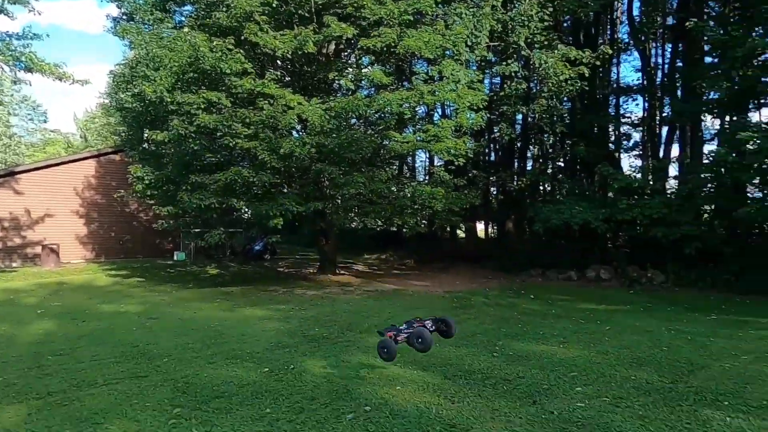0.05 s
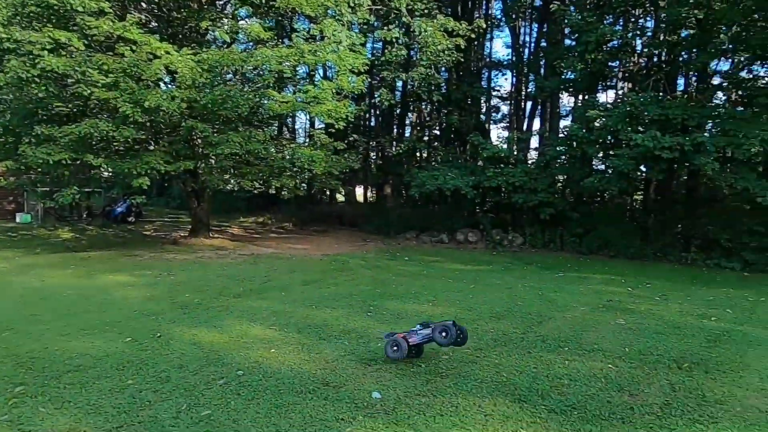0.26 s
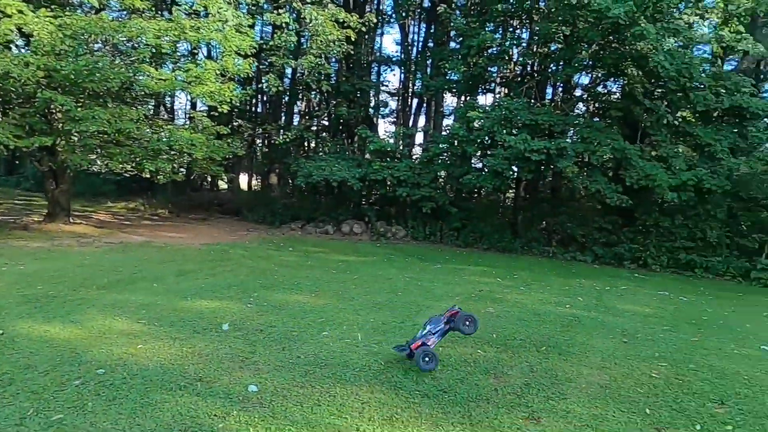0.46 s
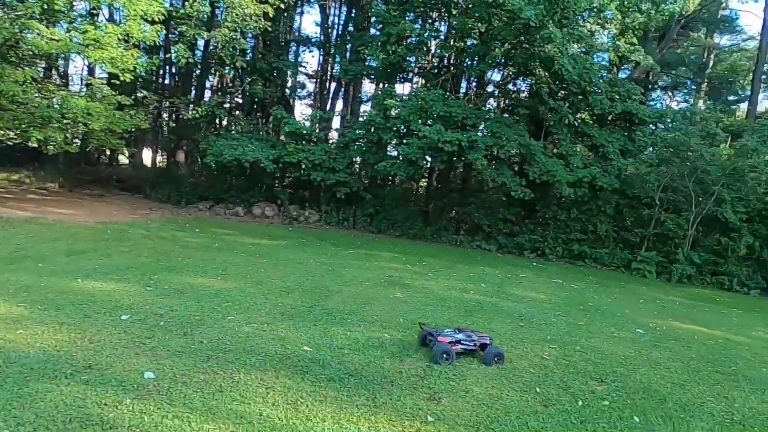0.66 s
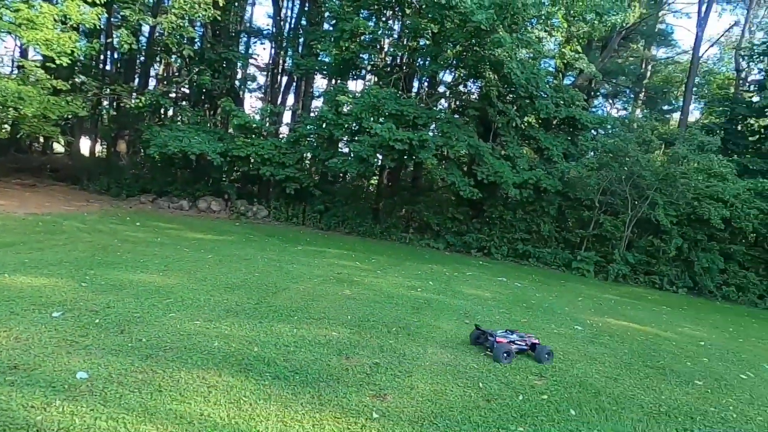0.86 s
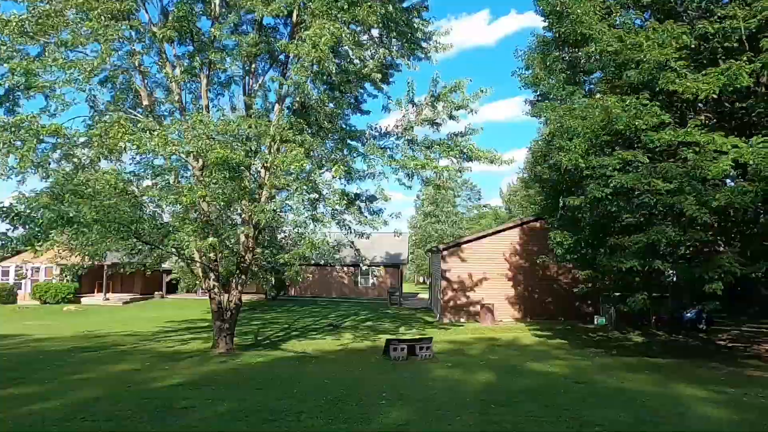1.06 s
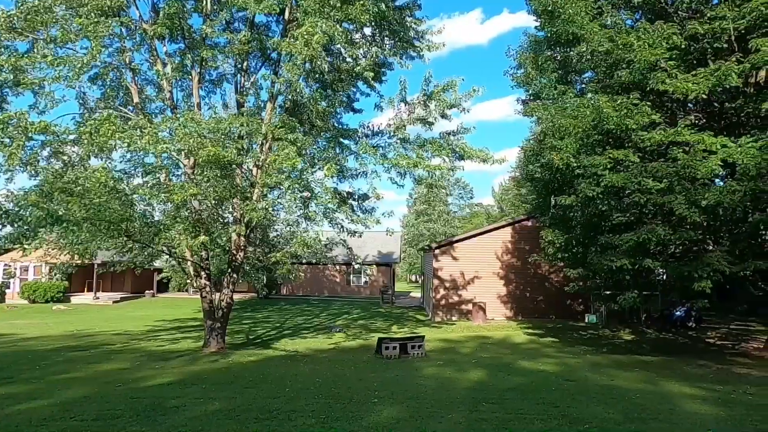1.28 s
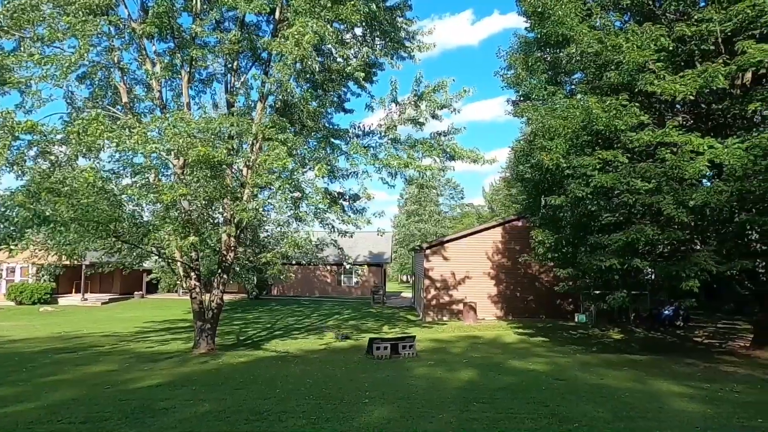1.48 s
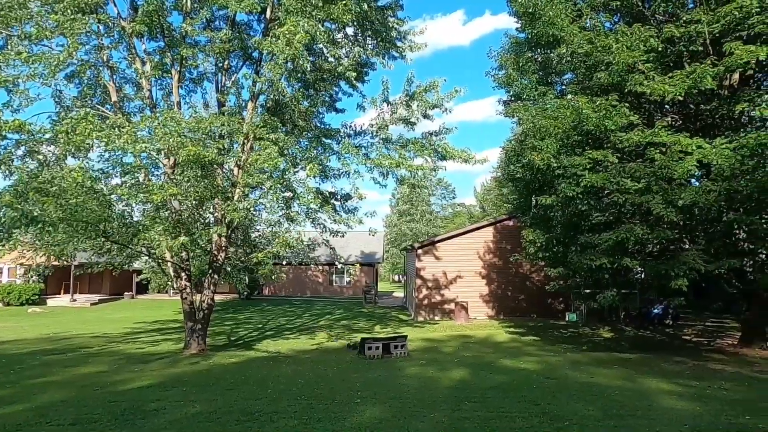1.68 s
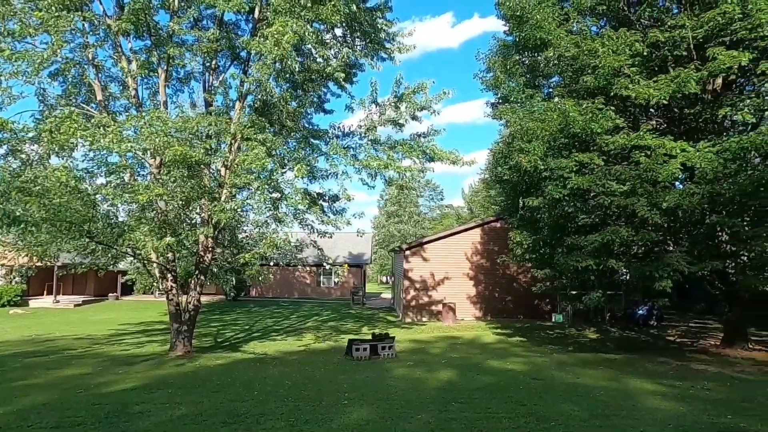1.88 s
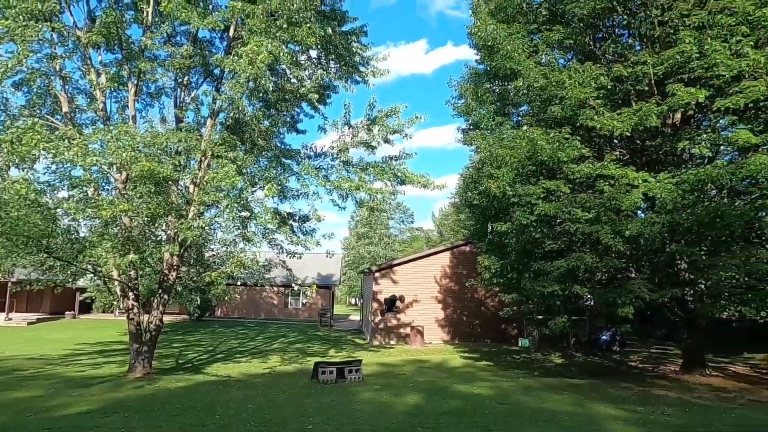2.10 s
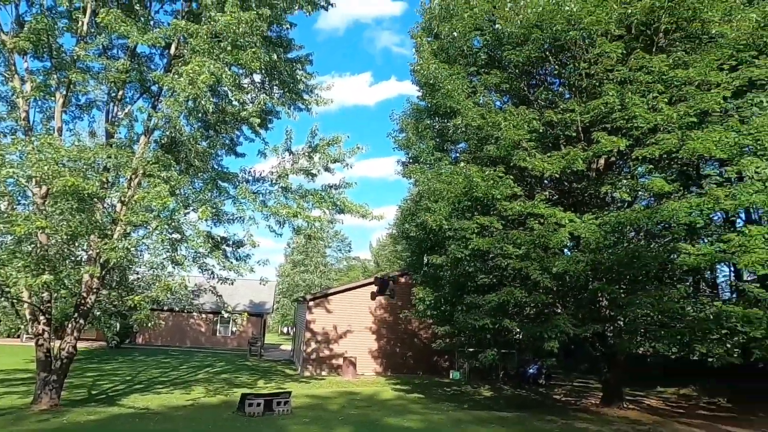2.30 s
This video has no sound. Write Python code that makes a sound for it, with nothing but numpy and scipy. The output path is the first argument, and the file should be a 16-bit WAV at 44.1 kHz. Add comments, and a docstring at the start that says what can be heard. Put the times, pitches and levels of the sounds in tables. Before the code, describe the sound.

Whining radio-controlled car lands hard, races across a lawn and clatters off a ramp.

```python
"""A radio-controlled car drops onto a lawn with its wheels spinning, bounces and blips its throttle.
After an abrupt change of scene it races over the grass, bangs up a small ramp and whirs off through the air.
Its gears whine at a pitch that follows the motor, its tyres tear at the grass, and each blow makes
the body ring and loose plastic clatter. A far engine, probably a mower, drones behind,
and light wind rumbles on the microphone."""
import sys
import numpy as np
from scipy import signal
from scipy.fft import rfft, irfft, next_fast_len
from scipy.io import wavfile
from scipy.ndimage import map_coordinates

SR = 44100
rng = np.random.default_rng(int(sys.argv[2]) if len(sys.argv) > 2 else 0)


def master_out(mix):
    """Clip the mix to full scale and print it as 16-bit PCM to the path in sys.argv[1]."""
    frames = np.transpose(np.atleast_2d(mix))
    ceiling = np.clip(frames, -1, 1)
    pcm = np.round(ceiling * 32767).astype(np.int16)
    wavfile.write(sys.argv[1], SR, pcm)


N = 108045
TIME = np.arange(N) / SR
SCENE_CHANGE_S, TAKEOFF_S = 1.036, 2

# Gear whine on the run-up and in flight. Each row: time in seconds, pitch in Hz, level in dB.
RUN_WHINE = [(1.04, 1920, -51), (1.12, 2056, -50), (1.18, 1998, -49), (1.27, 2055, -47), (1.32, 1995, -49),
             (1.4, 2073, -50), (1.7, 2077, -43), (1.78, 2050, -49), (1.83, 2250, -39), (1.89, 2650, -32.5),
             (1.97, 2380, -39), (2.12, 2262, -48), (2.28, 1918, -44), (2.45, 1816, -49)]


def from_db(db):
    """Turn decibels into a gain."""
    return 10 ** (np.asarray(db) / 20)


def rms_one(x):
    """Scale a signal to an average strength (rms) of 1."""
    return x / np.sqrt(np.mean(x ** 2) + 1e-20)


def in_time(rows):
    """Join timed rows with straight lines, giving one curve for each column after the time."""
    times, *columns = np.transpose(rows)
    return [np.interp(TIME, times, column) for column in columns]


def loudness(rows):
    """Turn rows of time and dB into a gain curve."""
    return from_db(in_time(rows)[0])


def at_hz(points, hz):
    """Read between the points of a spectrum, with octaves evenly spaced."""
    known_hz, values = np.transpose(points)
    return np.interp(np.log(hz + 1), np.log(known_hz), values)


def drift(rate_hz):
    """A smooth random wobble, about 1 in size."""
    pole = np.exp(-2 * np.pi * rate_hz / SR)
    return rms_one(signal.lfilter([1], [1, -2 * pole, pole * pole], rng.standard_normal(N + SR))[SR:])


def cycles(hz):
    """The running phase of a pitch curve, in radians."""
    return 2 * np.pi * np.cumsum(hz) / SR


def noise(spectrum, grain_db=0, grain_hz=300, tilt_db=0):
    """Stereo noise, made grainy by fast bursts; tilt_db brightens it by that much per octave."""
    # Each row: frequency in Hz, how alike left and right are (1 is the same).
    likeness = [(200, 0.98), (500, 0.96), (1000, 0.87), (2200, 0.83), (4500, 0.85), (9000, 0.056),
                (15000, 0.12)]
    # Each row: frequency in Hz, left level minus right level in dB.
    balance = [(200, 0.5), (700, 0), (1400, -0.5), (2800, 2), (5500, -2), (12000, -3.5)]
    size = next_fast_len(N)
    hz = np.arange(size // 2 + 1) * SR / size
    mid, side = rfft(rng.standard_normal((2, N)) * from_db(grain_db * drift(grain_hz)), size)
    alike, signs = np.clip(at_hz(likeness, hz), 0, 1), np.array([[1], [-1]])
    stereo = np.sqrt(1 + alike) * mid + np.sqrt(1 - alike) * side * signs
    gain = from_db(at_hz(spectrum, hz) + tilt_db * np.log2(hz + 1) + signs * at_hz(balance, hz) / 2)
    return rms_one(irfft(gain * stereo, size)[:, :N])


def rough_tones(rows, spread_hz):
    """Rough tones that swell and fade; each is down to about a third one fade time from its peak."""
    out = 0
    for peak_s, fade_s, hz, db in rows:
        phase = 2 * np.pi * hz * TIME
        tone = rms_one(drift(spread_hz) * np.sin(phase) + drift(spread_hz) * np.cos(phase))
        out = out + from_db(db) * np.exp(-((TIME - peak_s) / fade_s) ** 2) * tone
    return out


def gear_tones(curve, partials, spread_hz, clean, width):
    """Gear tones follow the motor's speed; slack between the teeth smears the higher ones most."""
    hz, db = in_time(curve)
    phase, out = cycles(hz * (1 + .008 * drift(30.8))), 0
    for multiple, level_db in partials:
        shared = clean + (drift(spread_hz * multiple) + 1j * drift(spread_hz * multiple)) / 2
        per_side = width * multiple * np.array([drift(spread_hz), drift(spread_hz)])
        tone = np.real((shared + 1j * per_side) * np.exp(1j * multiple * phase))
        out = out + from_db(level_db) * rms_one(tone)
    return from_db(db) * out


def gear_whine():
    """The gears whine through the landing and throttle blip, then through the run-up and flight."""
    # Whine around the landing. Each row: time in seconds, pitch in Hz, level in dB.
    blip_whine = [(0, 1700, -35.5), (.2, 1740, -41), (.3, 1500, -54), (.55, 1404, -40.5),
                  (.62, 1500, -51.5), (.685, 1950, -50), (.722, 1720, -26.5), (.738, 2400, -30),
                  (.762, 2400, -32), (.782, 2580, -23.5), (.798, 3000, -33), (.818, 2680, -26.5),
                  (.85, 2330, -39), (1.03, 2100, -46)]
    # The tones in each whine. Each row: multiple of the pitch, relative level in dB.
    blip_partials = [(1, 2.5), (2, -14.5), (3, -24), (4, -24)]
    run_partials = [(.5, -7), (1, 0), (2.59, -7)]
    blip = gear_tones(blip_whine, blip_partials, spread_hz=166, clean=.15, width=.14)
    run = gear_tones(RUN_WHINE, run_partials, spread_hz=69, clean=.29, width=.2)
    return np.where(TIME < SCENE_CHANGE_S, blip, run)


def wheels():
    """The drive and wheels whir, the turf rumbles under them and the tyres tear through grass blades."""
    # How loud each sound is. Each row: time in seconds, level in dB.
    whir_levels = [(0, -25.5), (.19, -24), (.3, -23), (.38, -26.5), (.44, -26), (.47, -32), (.55, -34),
                   (.64, -44.5), (.7, -33), (.75, -34.5), (.84, -29.5), (.9, -39), (1.03, -36),
                   (1.04, -42.5), (1.75, -47), (1.95, -29), (2.18, -28), (2.28, -32), (2.45, -33.5)]
    rumble_levels = [(0, -38), (.25, -33), (.41, -37), (.48, -33), (.62, -42), (.68, -32.5), (.8, -34),
                     (.84, -23.5), (1, -42), (1.3, -37), (1.6, -33), (1.85, -28), (1.95, -27.5),
                     (2.19, -31.5), (2.26, -28), (2.29, -47), (2.45, -60)]
    grass_levels = [(.66, -68), (.72, -34), (.84, -48.5), (.9, -38), (1.02, -40), (1.06, -39), (1.4, -34.5),
                    (1.72, -32.5), (1.88, -29.5), (1.97, -36), (2.14, -33.5), (2.22, -46), (2.45, -54)]
    # The tone colour of each. Each row: frequency in Hz, relative level in dB.
    whir_spectrum = [(120, -78), (200, -37), (358, -6), (461, -4.5), (543, -5.5), (651, -6), (855, -9),
                     (954, -3), (1230, -7.5), (1710, -11), (1870, -6), (3220, -8.5), (6090, -19),
                     (7850, -24), (9580, -28.5), (15400, -44.5)]
    rumble_spectrum = [(70, -18), (115, 10.5), (160, -3.5), (230, 1.5), (330, -4.5), (480, -14.5),
                       (800, -17.5), (1600, -59)]
    grass_spectrum = [(180, -10), (300, -15), (492, -2), (706, -14.5), (1030, -8), (1750, -13.5),
                      (2030, -12), (2550, -12), (3550, -12), (5360, -9.5), (6000, -12), (6750, -10),
                      (7570, -17.5), (9600, -21), (13700, -29.5), (15400, -52)]
    whir = loudness(whir_levels) * noise(whir_spectrum, grain_db=1.5, grain_hz=241)
    grass = loudness(grass_levels) * noise(grass_spectrum, grain_db=2, grain_hz=716)
    rumble = loudness(rumble_levels) * noise(rumble_spectrum, grain_db=1.5, grain_hz=122)
    return whir + grass + rumble


def mower():
    """A far engine drones on three overtones of its slightly wavering speed."""
    # The drone's swells. Each row: time in seconds, level in dB.
    levels = [(0, -36), (.4, -31), (.62, -36.5), (1.03, -38), (1.045, -25.5), (1.2, -25.5), (1.5, -24.5),
              (1.66, -33), (1.77, -22), (2.1, -21.5), (2.35, -35.5), (2.45, -27.5)]
    # Each row: multiple of the engine's rate, relative level in dB.
    overtones = [(2, -1), (3, -27), (4, -23)]
    engine_hz = 53.52
    phase, drone = cycles(engine_hz * (1 + .002 * drift(2.04))), 0
    for multiple, db in overtones:
        gain = from_db(db + .5 * drift(7.6)) * np.sqrt(2)
        drone = drone + gain * np.sin(multiple * phase + rng.uniform(0, 2 * np.pi))
    return loudness(levels) * drone


def wind():
    """Light gusts rumble on the microphone."""
    # The gusts. Each row: time in seconds, level in dB.
    levels = [(0, -38), (.35, -33), (.42, -31), (.5, -44), (.62, -38.5), (.83, -34.5), (1.12, -35.5),
              (1.35, -28), (1.65, -32), (1.9, -29), (2.1, -34), (2.28, -29), (2.45, -41.5)]
    # Each row: frequency in Hz, relative level in dB.
    spectrum = [(8, -25), (30, 1), (60, 16.5), (100, 10), (200, 9), (500, -62)]
    return loudness(levels) * noise(spectrum)


def tyre_scuffs():
    """Spinning tyres bite the grass: the noise rises quickly, holds and dies away."""
    # Each row: start in seconds, length in seconds, level in dB, brightness in dB per octave.
    bites = [(0.199, 0.077, -16.5, 1), (0.247, 0.073, -19.5, -1.5), (.42, 0.023, -40, -6),
             (0.707, 0.17, -35.5, -3.5), (0.72, 0.17, -40.5, 15), (2.1, 0.04, -34, 4)]
    # Each row: frequency in Hz, relative level in dB.
    spectrum = [(120, -5), (400, -1), (1100, 1), (2300, -0.5), (3050, 1.5), (3700, -5.5), (6800, -6.5),
                (8500, -15.5), (15000, -27.5)]
    rise_s, fade_s, out = .016, .01, 0
    for start, length, db, tilt_db in bites:
        rise = np.clip((TIME - start) / rise_s, 0, 1)
        fade = np.exp(-np.maximum(TIME - start - length, 0) / fade_s)
        out = out + from_db(db) * rise * fade * noise(spectrum, grain_db=1, grain_hz=503, tilt_db=tilt_db)
    return out


def squeals():
    """Slipping rubber and strained gears squeal briefly."""
    # Each row: peak time in seconds, fade time in seconds, pitch in Hz, level in dB.
    slips = [(0.225, 0.018, 3020, -18.5), (0.724, 0.023, 3170, -25), (.799, 0.008, 8780, -30.5)]
    return rough_tones(slips, spread_hz=160)


def ring(clicks, hz, ring_s):
    """Each click starts a pure tone that falls by 60 dB in ring_s seconds."""
    decay, step = from_db(-60 / (ring_s * SR)), 2 * np.pi * hz / SR
    return signal.lfilter([0, np.sin(step)], [1, -2 * decay * np.cos(step), decay ** 2], clicks + 1e-18)


def blows(hits, tones, clatter_spectrum, clatter_s, tail_db, tail_s, vary_db):
    """Each blow rings the body and shakes loose plastic parts; a faint tail comes back from the yard."""
    starts, thump_db, clatter_db = np.transpose(hits)
    chance = rng.standard_normal((len(starts), len(tones)))
    ringing, clatter_power = 0, 0
    for k, (hz, db, ring_s) in enumerate(tones):
        clicks = np.zeros(N)
        clicks[(starts * SR).astype(int)] = from_db(thump_db + db + vary_db * chance[:, k])
        ringing = ringing + (-1) ** k * ring(clicks, hz, ring_s)
    for start, db in zip(starts, clatter_db):
        age = np.maximum(TIME - start, 0)
        fade = np.exp(-age / clatter_s) + from_db(tail_db) * np.exp(-age / tail_s)
        clatter_power = clatter_power + (from_db(db) * (age > 0) * fade) ** 2
    return ringing + np.sqrt(clatter_power) * noise(clatter_spectrum, grain_db=-.5, grain_hz=600)


def landing():
    """The frame and wheels slam onto the ground and bounce."""
    # Each row: start in seconds, thump level in dB, clatter level in dB.
    hits = [(.268, 1.5, -13), (.276, -10, -9), (.283, -5.5, 1), (.294, 2, -11), (.305, -22, 0.5),
            (.316, -4, -8.5), (.323, -17, -5), (.334, -7, -22), (.396, -24, -24), (.425, -24, -20.5),
            (.821, -20, -26.5), (.829, -20, -29)]
    # The frame's ringing tones. Each row: pitch in Hz, relative level in dB, ring time in seconds.
    tones = [(68.5, -9.5, 0.16), (138, -1.5, 0.043), (203.4, -7.5, 0.19), (281, -16.5, 0.23),
             (312, -15.5, 0.13), (514, -19.5, 0.27), (571, -10, 0.13), (840, -25, 0.27), (988, -15, 0.063),
             (1470, -15, 0.05)]
    # Loose plastic. Each row: frequency in Hz, relative level in dB.
    clatter = [(100, 6), (300, 8.5), (600, 2), (750, -1.5), (1000, 0.5), (1500, -0.5), (1800, -9),
               (3000, -7), (5000, -16), (8000, -29), (15000, -47)]
    return blows(hits, tones, clatter, clatter_s=.0085, tail_db=-27, tail_s=.056, vary_db=1.5)


def shell_drumming():
    """The plastic shell drums after a blow."""
    # Each row: peak time in seconds, fade time in seconds, pitch in Hz, level in dB.
    beats = [(.342, 0.022, 340, -14), (.75, 0.025, 420, -28), (.829, 0.019, 380, -23)]
    return rough_tones(beats, spread_hz=110)


def gearbox():
    """The gear teeth rasp, their housing sings, and the gears scream as the throttle opens."""
    # The teeth's high rasp. Each row: time in seconds, pitch in Hz, level in dB.
    rasp_curve = [(.84, 6150, -61), (.88, 6120, -47), (1.03, 6050, -49), (1.04, 4880, -50),
                  (1.12, 5400, -43), (1.19, 5100, -44), (1.28, 5330, -42.5), (1.33, 5020, -42),
                  (1.38, 5380, -42.5), (1.78, 5320, -41.5), (1.83, 5970, -35), (1.86, 6060, -45),
                  (2.08, 6200, -50), (2.12, 5970, -27.5), (2.17, 5940, -50)]
    # Each row: multiple of the pitch, relative level in dB.
    rasp_partials = [(1, 1), (2, -15)]
    # Each row: peak time in seconds, fade time in seconds, pitch in Hz, level in dB.
    housing = [(1.3, 0.71, 2988, -46.5)]
    screams = [(1.815, 0.024, 5610, -29), (1.878, 0.027, 6280, -32.5)]
    rasp = gear_tones(rasp_curve, rasp_partials, spread_hz=150, clean=.4, width=.22)
    return rasp + rough_tones(screams, spread_hz=830) + rough_tones(housing, spread_hz=37)


def motor_hum():
    """The motor judders and growls under load, then clears as the wheels leave the ground."""
    # The hum's swells. Each row: time in seconds, level in dB.
    levels = [(1.8, -77), (1.9, -27), (1.97, -28.5), (2.2, -55), (2.3, -36.5), (2.45, -36.5)]
    motor_hz = in_time(RUN_WHINE)[0] / 4   # one turn for every four gear cycles
    judder = 1.53 * drift(78) * np.clip((TAKEOFF_S - TIME) * 20, .15, 1)
    return loudness(levels) * rms_one(np.sin(cycles(motor_hz) + judder))


def ramp_bangs():
    """The wheels and the skid plate under the car strike the ramp."""
    # Each row: start in seconds, thump level in dB, clatter level in dB.
    hits = [(1.982, -20, -17), (1.998, -27, -15.5), (2.013, -6, -19), (2.023, -2.5, -15),
            (2.031, -1.5, -21), (2.046, 0, -19), (2.058, -13, -16), (2.066, -4, -19), (2.076, -18, -17.5),
            (2.088, -11.5, -16), (2.102, -24, -25), (2.112, -15, -14.5), (2.121, -18, -24),
            (2.135, -16, -25), (2.185, -18, -24)]
    # The tones the blows ring. Each row: pitch in Hz, relative level in dB, ring time in seconds.
    tones = [(49.4, -20, 0.077), (77, -7, 0.085), (126, -20, 0.09), (171.5, -2, 0.055), (233, -3, 0.077),
             (293, -9.5, 0.071), (397, -14.5, 0.032), (583, -9, 0.02), (990, -30, 0.18),
             (1547, -22.5, 0.14)]
    # Loose plastic. Each row: frequency in Hz, relative level in dB.
    clatter = [(240, -4), (400, -8.5), (680, -11), (745, -20), (994, -7.5), (1330, -10.5), (2120, -10),
               (3890, -25), (5680, -26.5), (9000, -60), (15000, -58)]
    return blows(hits, tones, clatter, clatter_s=.018, tail_db=-17.5, tail_s=.13, vary_db=4.5)


def skid_grind():
    """The skid plate grinds over the lip of the ramp."""
    # Each row: peak time in seconds, fade time in seconds, pitch in Hz, level in dB.
    scrapes = [(2.085, 0.022, 1606, -28), (2.12, 0.022, 2243, -21.5)]
    return rough_tones(scrapes, spread_hz=190)


def with_echoes(stereo):
    """Echoes off the ground and buildings reach each side at slightly different moments."""
    # Each row: typical delay in seconds, level in dB.
    reflections = [(.007, -9), (.045, -13.5)]
    out = stereo.copy()
    for side, direct in enumerate(stereo):
        for delay, db in reflections:
            out[side] += from_db(db) * np.interp(TIME - delay * rng.uniform(.8, 1.2), TIME, direct, left=0)
    return out


def scene():
    """The car, the mower and the wind together; the sound reaches the left side a moment later."""
    impacts = landing() + ramp_bangs()
    strain = squeals() + shell_drumming() + skid_grind()
    gears = gear_whine() + gearbox()
    drive = motor_hum() + with_echoes(gears)
    left, right = impacts + strain + drive + wheels() + tyre_scuffs() + mower() + wind()
    left_lag_s = .00004
    return np.array([map_coordinates(left, [np.arange(N) - left_lag_s * SR], mode="nearest"), right])


def record(dry):
    """The microphone hollows the treble, the hardest blows overload, and the highest treble is cut."""
    hollow_hz, cutoff_hz = 7720, 15600
    picked_up = dry - .31 * signal.lfilter(*signal.iirpeak(hollow_hz, Q=5.8, fs=SR), dry)
    clipped = picked_up / (1 + picked_up ** 8) ** (1 / 8)
    dip_db, dip_s = -13, .0044   # the level dips briefly between the two scenes
    dip = from_db(dip_db * np.exp(-((TIME - SCENE_CHANGE_S) / dip_s) ** 2))
    return signal.sosfilt(signal.cheby2(12, 60, cutoff_hz, fs=SR, output="sos"), clipped * dip)


dry = scene()
out = record(dry)
master_out(out)
```